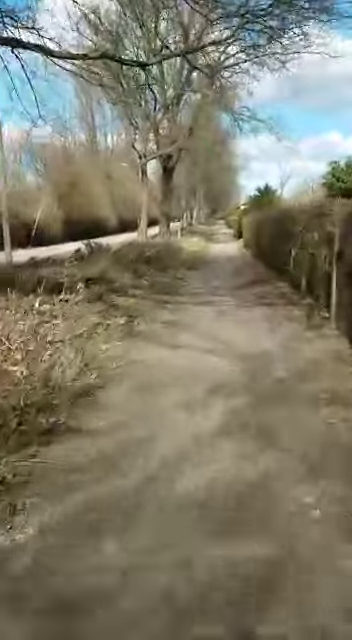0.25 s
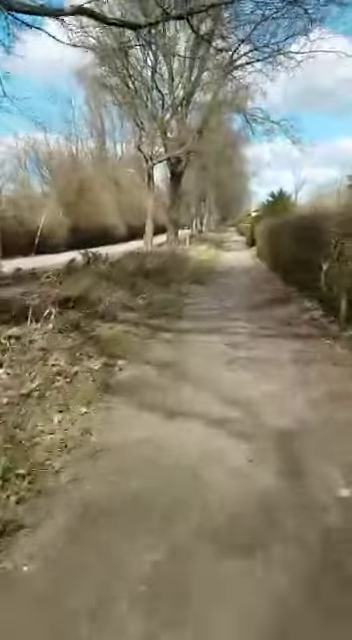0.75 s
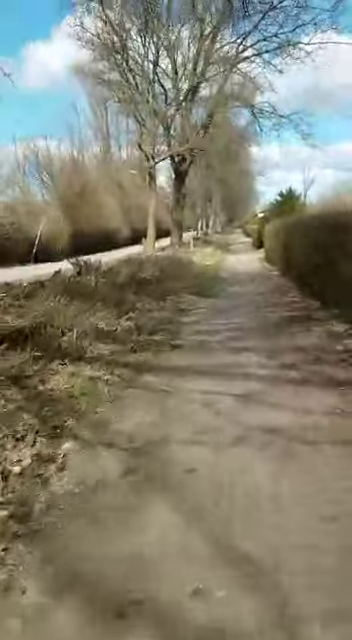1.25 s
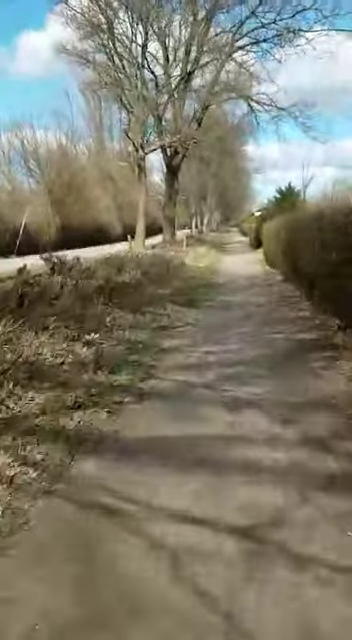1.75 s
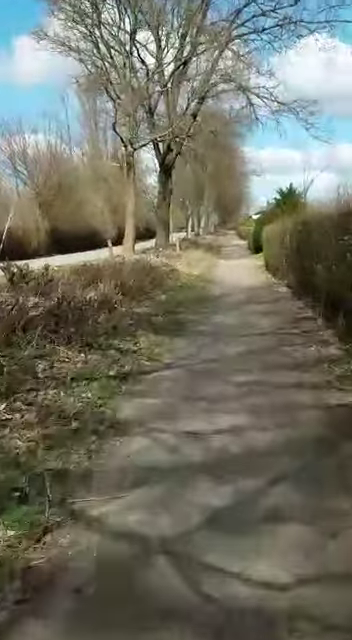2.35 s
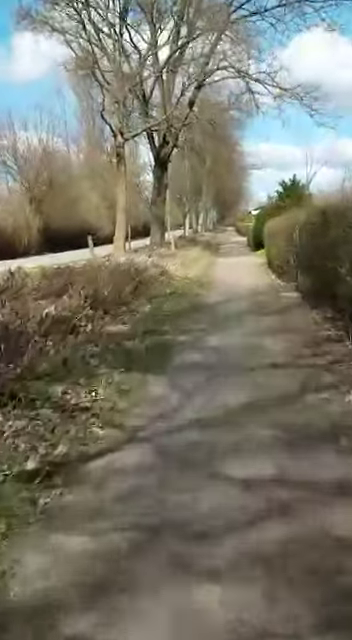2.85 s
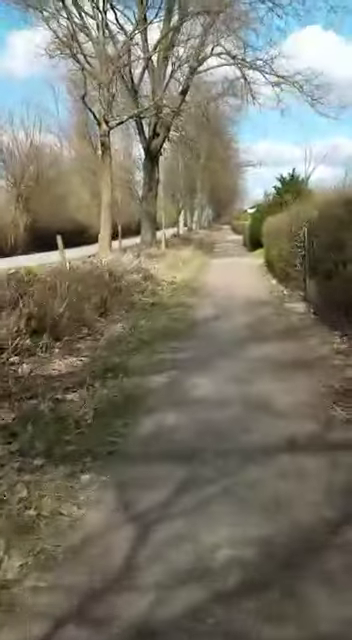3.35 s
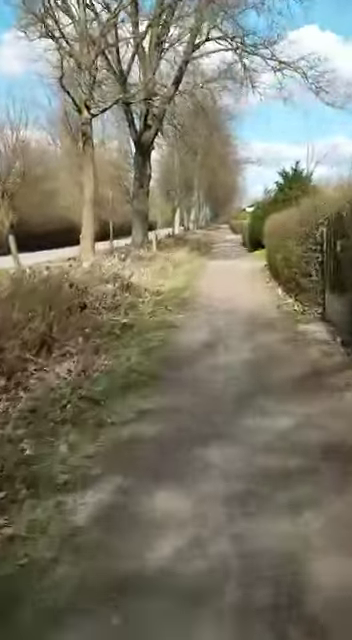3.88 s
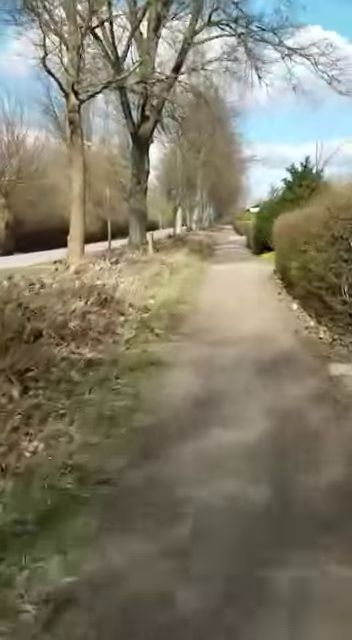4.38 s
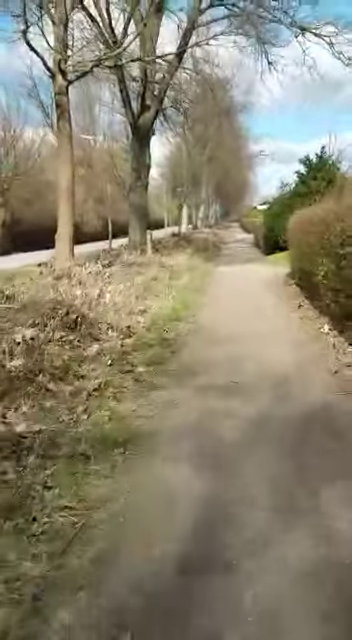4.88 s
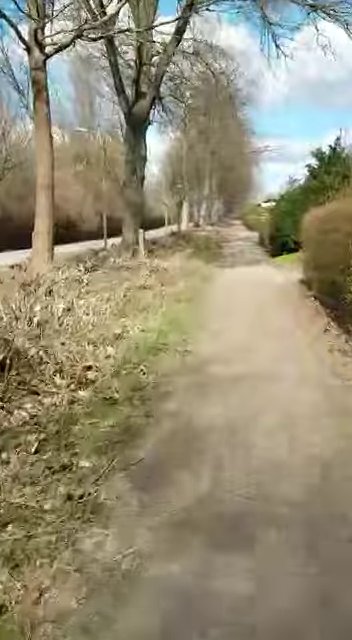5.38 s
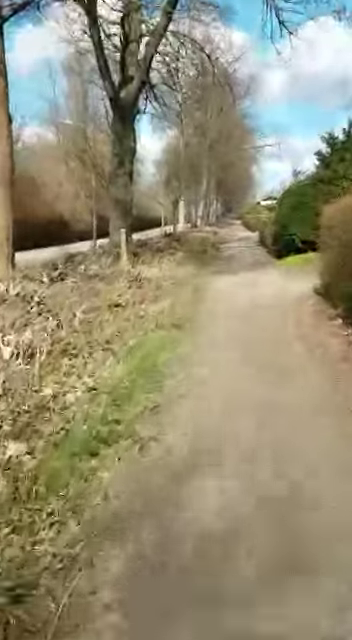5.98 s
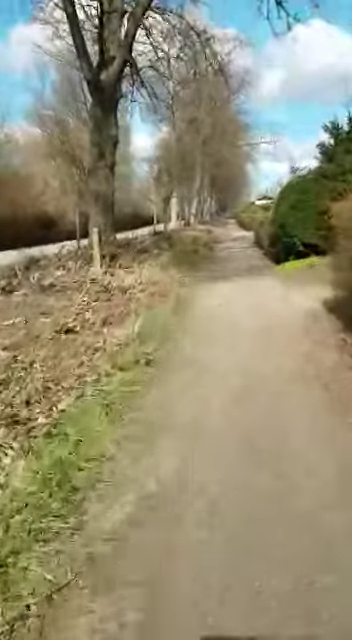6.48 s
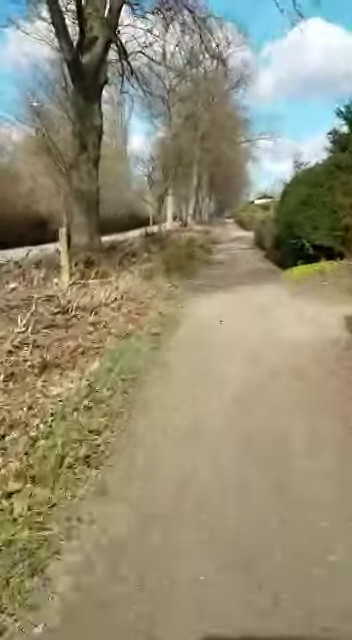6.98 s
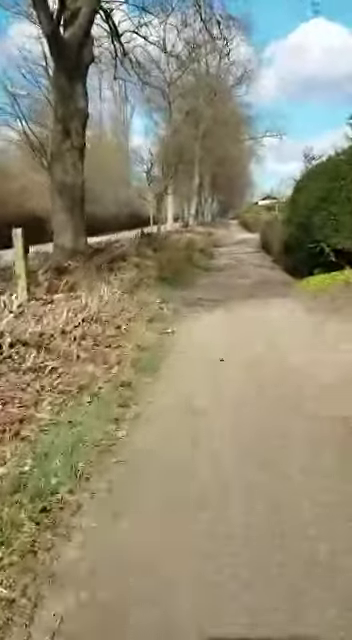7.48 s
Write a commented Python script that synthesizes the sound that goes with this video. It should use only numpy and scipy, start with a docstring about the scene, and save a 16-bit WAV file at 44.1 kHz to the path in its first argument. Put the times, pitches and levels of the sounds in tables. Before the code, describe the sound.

A small electric vehicle travels at a steady pace along an uneven dirt path, heard from a stereo microphone riding on board. Deep chassis rumble, a low wavering hum near 240 Hz and soft tyre hiss last throughout. A higher whine, leaning right, is clearest at the start, drops out near 0.5 s, returns briefly and fades back by 1.2 s. Loose plastic panels knock, bounce and ping irregularly, mostly on the right. A faint clear squeak appears around 0.9 s, with thin hoarse squeals from 0.7 to 1.3 s and again at 3.3 to 3.8 s. Ruts boom at 0.3, 1.4, 1.9 and 2.3 s. A strong rattle hits near 3.1 s; things ease around 4.1 to 4.6 s, with a small grit spurt. Booms and dense clatter peak from 5.6 to 6.4 s, then thin out, with more bumps near 7.4 s. Motion continues to the end, about 7.7 s.

```python
"""Electric vehicle on a bumpy dirt path

On board a small electric vehicle at a steady pace: the tyres shake the chassis and frame into a low
rumble, made of noise through resonances, and ruts make the frame boom. The drive hums and whines as
wavering sines. Loose plastic panels chatter at every jolt, mostly on the right: noise bursts through
resonances, plus pings. Grit hisses and cracks under the wheels; a thin squeal and a squeak come and go."""
import sys
import numpy as np
from scipy import signal
from scipy.fft import rfft, irfft, next_fast_len
from scipy.io import wavfile
from scipy.ndimage import uniform_filter1d

SR = 44100
rng = np.random.default_rng(int(sys.argv[2]) if len(sys.argv) > 2 else 0)


def log_audio(samples):
    """Write samples as a 16-bit WAV file to the path given in sys.argv[1]."""
    # one column per channel
    frames = np.atleast_2d(samples).T
    # limit to full scale, then quantise
    limited = np.clip(frames, -1, 1)
    pcm = np.round(limited * 32767).astype(np.int16)
    wavfile.write(sys.argv[1], SR, pcm)


N = 340893
TIME = np.arange(N) / SR
SIZE = next_fast_len(N + SR // 4, real=True)  # room for the filters to ring out
FREQ = np.arange(SIZE // 2 + 1) * SR / SIZE

# resonances of the frame: (frequency [Hz], width [Hz], left level [dB], right level [dB])
FRAME_MODES = [(114.6, 32.5, -8.5, 2), (139, 25.5, -3, -2), (161, 27, -13, -3.5), (207.1, 17.5, -4.5, -0.5),
               (242, 22.5, -11, -8), (301, 48.4, -13, -8.5), (375, 24, -25.5, -18), (454, 50, -20.5, -14),
               (577, 41.4, -19.5, -12.5)]


def undb(db):
    """Decibels to gain."""
    return 10 ** (np.asarray(db) / 20)


def curves(table):
    """Each column of a table, joined by straight lines in time."""
    s, *columns = np.transpose(table)
    return [np.interp(TIME, s, column) for column in columns]


def walk(rate):
    """Random levels held 1 / rate s and slewed twice; spread near 1."""
    k = max(int(SR / rate), 2)
    held = np.repeat(rng.standard_normal(N // k + 1), k)
    slewed = uniform_filter1d(uniform_filter1d(held, k), k)
    return np.sqrt(2) * slewed[:N]


def noise(alike):
    """White noise at two ears that share a part of it."""
    alike = np.clip(alike, 0, 1)
    shared = np.sqrt(alike) * rng.standard_normal(N)
    return shared + np.sqrt(1 - alike) * rng.standard_normal((2, N))


def colour(x, gain):
    """Causal filter with one gain curve per ear; white noise keeps its power, averaged over the ears."""
    # folding the cepstrum forward in time makes the filter minimum-phase, so nothing sounds early
    cepstrum = irfft(np.log(gain / np.sqrt(np.mean(gain ** 2)) + 1e-7), SIZE)
    cepstrum[:, 1:SIZE // 2] *= 2
    cepstrum[:, SIZE // 2 + 1:] = 0
    return irfft(rfft(x, SIZE) * np.exp(rfft(cepstrum)), SIZE)[:, :N]


def ring(x, modes):
    """Pass a force through steep-sided resonances, each with its own strength at each ear."""
    hz, width, *ears_db = np.transpose(modes)
    shapes = 1 / (1 + ((FREQ - hz[:, None]) / width[:, None]) ** 2) ** 2
    return colour(x, np.sqrt(undb(ears_db) ** 2 @ shapes))


def hold(x, seconds):
    """Even out the slow chance swells of a noise to rms 1."""
    power = uniform_filter1d(np.mean(x ** 2, axis=0), max(int(seconds * SR), 2))
    return x / np.sqrt(power + 1e-12)


def from_right(x, lag_s):
    """The left ear hears it a little later."""
    return np.array([np.interp(TIME - lag_s, TIME, x[0]), x[1]])


def add(track, s, sound):
    """Mix a short sound into a track at time s."""
    i = int(np.clip(s * SR, 0, N - 1))
    track[..., i:i + sound.shape[-1]] += sound[..., :N - i]


def clatter(per_s, decay_s, spread_db):
    """Strength of many small chance contacts, each sharp at first and quickly gone; rms 1."""
    chance = rng.random(N) < per_s / SR
    energy = chance * undb(spread_db * np.clip(rng.standard_normal(N), -2, 2)) ** 2
    energy = signal.lfilter([1], [1, -np.exp(-1 / (decay_s * SR))], energy)
    return np.sqrt(energy / np.mean(energy))


def roughness():
    """How much rougher than average the path is, in dB; it drives rumble, motor sag, rattle and grit."""
    # roughness of the path, only its swing about the mean counts: (time [s], roughness [dB])
    ground = [(0.0, -38.5), (0.11, -51.5), (0.29, -41), (0.56, -53.5), (0.74, -51.5), (0.88, -43.5),
              (1.22, -46), (1.55, -44.5), (1.8, -46.5), (1.98, -47), (2.3, -37), (2.6, -49), (3.0, -46),
              (3.12, -40), (3.6, -45), (3.93, -42), (4.05, -48.5), (4.28, -51), (4.72, -50), (4.97, -41),
              (5.22, -47.5), (5.38, -42), (5.8, -43), (5.98, -35.5), (6.12, -42), (6.3, -35.5),
              (6.58, -50.5), (6.76, -43.5), (7.03, -50), (7.4, -43), (7.53, -48), (7.73, -41)]
    db, = curves(ground)
    return db - np.mean(db)


def rumble():
    """The uneven ground rocks the chassis on its tyres and shakes the frame."""
    # level of the chassis rumble: (time [s], level [dB])
    heave = [(0, -15.5), (.3, -12.5), (.62, -18.5), (1.65, -15), (2.3, -17), (3.3, -15.5), (3.75, -18.5),
             (3.9, -19), (4.0, -13.5), (4.1, -18.5), (4.5, -17), (4.6, -15.5), (4.8, -19), (6.25, -16.5),
             (6.55, -18.5), (7.05, -16.5), (7.73, -21)]
    # resonances of the chassis: (frequency [Hz], width [Hz], left level [dB], right level [dB])
    chassis_modes = [(27, 11, -13.5, -10), (44, 12, -7.5, -4), (64, 8.5, -.3, 3.2), (78, 14, -11, -8)]
    shake_db, shake_rise = -20, 0.15  # on average ground; dB per dB of roughness
    chassis = hold(ring(noise(alike=0.98), chassis_modes), seconds=0.18) * undb(curves(heave)[0])
    frame = hold(ring(noise(alike=0.95), FRAME_MODES), seconds=.08)
    frame = frame * undb(shake_db + shake_rise * roughness())
    return from_right(chassis + frame, lag_s=0.00006)


def motor():
    """Motor and gear tones: rough ground slows them, and their speed and strength waver at random."""
    # swell of the whine: (time [s], level [dB])
    drive = [(0.0, -24.5), (0.49, -49), (0.62, -27.5), (1.22, -35.5), (7.73, -35.5)]
    # (multiple of the whine [1], left level [dB], right level [dB],
    #  share of the whine's swell [0-1], flutter [dB])
    tones = [(.5, 3.5, 7.5, 0.07, 1.5), (1, -12, 2.5, 0.96, 1.8), (1.261, -21, -3.5, 0.3, 4),
             (1.501, -39, -17, 0.1, 0)]
    whine_hz, sag_hz_per_db = 486, .5
    whine_db, = curves(drive)
    hz = whine_hz - sag_hz_per_db * roughness()
    turns = np.cumsum(hz * (1 + .008 * walk(9) + .002 * walk(30))) / SR
    mean_db, out = np.mean(whine_db), 0
    for multiple, left_db, right_db, share, flutter_db in tones:
        flutter = flutter_db * np.clip(walk(16), -2, 2)
        swell_db = mean_db + share * (whine_db - mean_db) + flutter
        # play in the gears lets each tone slip a little against the shaft
        slip = .07 * walk(24)
        tone = np.sqrt(2) * np.sin(2 * np.pi * (multiple * (turns + slip) + rng.random()))
        out = out + undb([[left_db], [right_db]]) * undb(swell_db) * tone
    return out


def blows():
    """Every knock as (s, level dB, hardness, thud dB): each jolt's fading bounces, then small stones."""
    # jolts that set the loose panels bouncing: (time [s], knock level [dB], hardness [0-1],
    #  thud of the shell [dB], knocks [count], time between knocks [s])
    jolts = [(.047, -37, 0.1, -30.5, 1, 0), (0.1688, -31.5, 0.1, -25.5, 1, 0), (0.2619, -31, 0, -24, 1, 0),
             (0.281, -27, 0.88, -25.5, 1, 0), (0.445, -31.5, 0.4, -27.5, 2, 0.024),
             (.594, -35.5, 0.2, -39, 2, 0.053), (0.6667, -28, 0.55, -28.5, 1, 0),
             (0.808, -25.5, 0.2, -32, 1, 0.0054), (0.84, -25.5, 0.4, -21.5, 1, 0),
             (0.9498, -27, 0.82, -25, 2, 0.024), (1.068, -28, 0.55, -34, 1, 0),
             (1.112, -41, 0.2, -34, 2, 0.067), (1.231, -36, 0.1, -31.5, 1, 0), (1.28, -27, 0.43, -30, 1, 0),
             (1.3365, -32, 0.1, -27, 1, 0), (1.4115, -25, .75, -26.5, 1, 0),
             (1.5323, -26, 0.59, -25, 2, 0.036), (1.655, -31.5, 0.4, -29, 1, 0),
             (1.692, -29, 0.46, -29, 2, 0.036), (1.849, -35, 0.1, -29.5, 1, 0),
             (1.873, -30, 0.54, -32, 1, 0), (1.96, -36.5, 0.35, -40, 1, 0), (2.045, -30, 0.1, -27, 1, 0),
             (2.107, -33.5, 0.5, -28, 1, 0), (2.156, -26.5, 0.5, -22, 2, .028), (2.2, -25, 0.6, -26, 1, 0),
             (2.253, -33, 0.2, -45, 1, 0), (2.2803, -27, 0, -26.5, 2, 0.042),
             (2.351, -24, 0.6, -23.5, 2, 0.04), (2.4693, -33.5, 0, -33.5, 2, 0.029),
             (2.535, -31, 0, -30, 1, 0), (2.6688, -30, 0.5, -27, 1, 0),
             (2.7354, -27, 0.42, -24.5, 2, 0.056), (2.8829, -32, 0.4, -28, 1, 0),
             (2.971, -34, 0, -40, 1, 0.012), (3.0336, -27, 0.4, -27, 1, 0), (3.06, -19.5, 0.3, -23, 1, 0),
             (3.0805, -24.5, 0.74, -26.5, 1, 0), (3.114, -28, .1, -24, 1, 0), (3.162, -27, 0, -29, 1, 0),
             (3.183, -28.5, 0.57, -25, 1, 0), (3.242, -37, .2, -23, 1, 0), (3.2637, -25.5, 0.71, -34, 1, 0),
             (3.316, -34, 0, -32, 1, 0), (3.402, -24, 0.48, -24.5, 1, 0),
             (3.4715, -28.5, 0.53, -28.5, 2, 0.067), (3.5901, -33, 0, -40, 1, 0),
             (3.667, -24, 0.46, -24, 2, 0.053), (3.817, -24.5, 0.4, -25, 2, 0.052),
             (3.9295, -23.5, 0.54, -23, 2, 0.018), (4.145, -44, .2, -35, 1, 0),
             (4.481, -40, 0.3, -33, 1, 0), (4.6442, -27, 0.38, -30, 1, 0), (4.81, -30, 0.7, -27, 2, 0.061),
             (4.919, -33, .1, -36, 1, 0), (4.9465, -33.5, 0.55, -41, 3, 0.029),
             (5.064, -30.5, 0.33, -30, 1, 0), (5.1035, -24.5, 0.6, -28.5, 1, 0),
             (5.3163, -28.5, 0.55, -27, 1, 0), (5.354, -35, 0, -32, 2, .02), (5.402, -30.5, 0, -28, 1, 0),
             (5.4494, -28, 0.5, -37, 1, 0), (5.533, -38, 0, -30, 1, 0), (5.5614, -23.5, 0.71, -21, 1, 0),
             (5.632, -28, 0.95, -27, 1, 0), (5.676, -32, 0.7, -26, 3, 0.033),
             (5.8303, -29.5, 0.15, -36, 1, 0), (5.8939, -28.5, 0.2, -22.5, 1, 0),
             (5.9379, -27, 0.72, -23.5, 2, 0.022), (5.978, -26, 0.67, -21.5, 3, 0.032),
             (6.099, -31, .1, -30, 1, 0), (6.1695, -25, 0.62, -23.5, 2, 0.027),
             (6.234, -24, 0.6, -23.5, 1, 0), (6.274, -31, .3, -32, 1, 0),
             (6.298, -24.5, 0.34, -27, 2, 0.025), (6.3465, -24.5, 0.4, -26, 3, 0.042),
             (6.499, -33, 0.2, -29, 1, 0), (6.724, -29.5, 0.2, -26, 2, 0.019), (6.791, -39, 0.3, -41, 1, 0),
             (6.8197, -32, 0.69, -30, 2, 0.054), (6.976, -35, .2, -39, 1, 0),
             (7.1328, -26, 0.4, -28, 2, 0.038), (7.243, -34, .1, -44, 1, 0), (7.376, -28, 0.3, -30, 1, 0),
             (7.429, -29.5, 0.1, -24, 1, 0), (7.4531, -30, 0.6, -31, 1, 0), (7.594, -34, 0.6, -28, 1, 0),
             (7.7061, -31.5, 0.45, -24.5, 1, 0)]
    # each bounce is this much weaker, and softer by this share
    bounce_loss_db, bounce_softens = 1.3, 0.36
    # small stones: level on average ground, dB per dB of roughness, scatter, thud relative to knock
    stones_per_s, stone_db, stone_rise, stone_scatter_db, stone_thud_db = 10, -41, 1.3, 5, -7
    out = []
    for s, db, hardness, thud_db, count, gap in jolts:
        for k in range(round(count)):
            loss_db = k * bounce_loss_db
            softer = np.clip(hardness, 0, 1) * (1 - bounce_softens) ** k
            out.append((s + k * gap, db - loss_db, softer, thud_db - loss_db))
    rough_db = roughness()
    # one stone at a random moment of each slot
    for k, (when, size, hardness) in enumerate(rng.random((int(stones_per_s * N / SR), 3))):
        s = (k + when) / stones_per_s
        db = stone_db + stone_rise * np.interp(s, TIME, rough_db) + stone_scatter_db * (2 * size - 1)
        out.append((s, db, hardness / 2, db + stone_thud_db))
    return out


def chatter(burst_s, tail_s, left_tail_db, right_tail_db, grain_db):
    """The force of one jolt: a burst of tiny contacts, and a diffuse tail at each ear."""
    t = TIME[:SR // 8]
    chance = rng.standard_normal((4, len(t)))
    grain = np.repeat(chance[1], 16)[:len(t)]
    burst = chance[0] * undb(grain_db * grain)
    # a longer burst also builds up more slowly
    rise = 1 - np.exp(-t / (.2 * burst_s))
    burst = burst * rise * np.exp(-(t / burst_s) ** 2)
    burst /= np.sqrt(np.sum(burst ** 2) / (burst_s * SR))
    tail = chance[2:] * rise * np.exp(-t / tail_s)
    return burst + undb([[left_tail_db], [right_tail_db]]) * tail


def spot(force):
    """Every contact lands on another spot; the reflection from the panel's edge gives it its own colour."""
    depth, longest_lag_s = .6, .0005  # two more samples are added to the lag
    where, side = rng.random(2)
    lag = 2 + int(where * longest_lag_s * SR)
    reflected = np.pad(force, ((0, 0), (lag, 0)))[:, :-lag]
    return (force + np.sign(side - .5) * depth * reflected) / np.hypot(1, depth)


def ping():
    """A small panel rings on after a knock; the spot hit sets the mix of its modes and bends their pitch."""
    # modes before bend and scatter:
    #  (frequency [Hz], time to fall 60 dB [s], left level [dB], right level [dB])
    ping_modes = [(2070, 0.063, -9.5, -11.5), (2233, 0.078, -26, -2.5), (2760, 0.052, -32, -23),
                  (3440, 0.055, -39, -14.5), (4297, 0.038, -27, -18)]
    scatter_db, detune = 6, .018
    t = TIME[:SR // 14]
    hz, t60, *ears_db = np.transpose(ping_modes)
    mix, bend, turn = rng.uniform(-1.09, 1, (3, len(ping_modes)))
    modes = np.sin(2 * np.pi * np.outer(hz * (1 + detune * bend), t) + np.pi * turn[:, None])
    decay = np.exp(-np.log(1000) * t / t60[:, None])
    modes = modes * decay * (1 - np.exp(-(t / .003) ** 2))  # soft onset
    return 2 * undb(ears_db + scatter_db * mix) @ modes


def bodywork():
    """Jolts throw loose panels and a metal catch against the shell; the panels also tremble all along."""
    # resonances and broad bands of the loose panels, the shell, the metal catch and the sharp crack,
    # all: (frequency [Hz], width [Hz], left level [dB], right level [dB])
    panel_modes = [(1520, 71, 3.5, 1), (1623, 23, 3, -3), (1831, 44, -11, 5), (1950, 35, -30, 0.5),
                   (2050, 120, -3, -24), (2220, 50, -8, 1.5), (2360, 160, -12.5, -3), (2580, 50, -6.5, -1),
                   (2705, 280, -37, -4.5), (3204, 82, -10, -5.5), (3520, 100, -41, -6),
                   (3890, 49, -29, -7.5), (4270, 370, -32, -13.5), (5540, 200, -32, -17),
                   (5840, 83, -22, -19), (6150, 280, -45, -13), (6800, 120, -46, -23),
                   (1720, 1540, -19, -11)]
    shell_modes = [(314.8, 33.8, 8.5, 16), (365.4, 25, 6.5, 10), (453.3, 47, 4.5, 9.5), (579, 44, 2.5, 3.5),
                   (629, 56, -9, 4.5), (728, 58, 0.5, 3), (795, 46, -5.5, 0.5), (879, 46, -3.5, 3.5),
                   (997, 31, -0.5, -3), (1100, 64, -6.5, -1.5), (1245, 360, -18, -6.5)]
    catch_modes = [(2340, 25, 2, -4), (3540, 79, -15, 4), (3900, 32, -9, 0.5), (4300, 160, -25, 3.5),
                   (4560, 34, -8, -12), (4920, 160, -28, -7.5), (10850, 2100, -26, -20)]
    crack_modes = [(4100, 3000, -26, 19.5), (8050, 300, -20, -25), (10200, 3300, 7, 1),
                   (11100, 780, -3, 13.5), (13100, 600, -19, 13.5), (14500, 1300, -27, -1)]
    # on average ground; dB per dB of roughness
    tremble_db, tremble_rise = -49.5, 1.35
    drum_db, drum_rise = -32, 0.63
    # relative to the knock's level: a soft contact, and what a fully hard one adds
    catch_db, catch_hard_db = -18, 15.5
    crack_db, crack_hard_db = -48, 50.5
    ping_db = -1.5  # relative to the knock's level
    frame_thud_db = -1  # how strongly the thuds also shake the frame
    thud_shared = 0.5  # gain of each ear's thud at the other ear, relative to its own
    knocks, pings, clacks, thuds, cracks = np.zeros((5, 2, N))
    rough_db = roughness()
    contacts = clatter(per_s=120, decay_s=.004, spread_db=3.5)
    tremble = noise(alike=0.38) * contacts * undb(tremble_db + tremble_rise * rough_db)
    flutter_db = 2 * np.clip(walk(60), -2, 2)
    drumming = noise(alike=0.82) * undb(drum_db + drum_rise * rough_db + flutter_db)
    for s, db, hardness, thud_db in blows():
        wait, weight = rng.random(2)
        knock = spot(chatter(burst_s=.012, tail_s=.021, left_tail_db=0, right_tail_db=-3, grain_db=4))
        rebound = spot(chatter(burst_s=.009, tail_s=.016, left_tail_db=0, right_tail_db=-4, grain_db=4))
        clack = spot(chatter(burst_s=.0065, tail_s=.012, left_tail_db=0, right_tail_db=-7, grain_db=5))
        crack = chatter(burst_s=.0065, tail_s=.011, left_tail_db=-3, right_tail_db=-6, grain_db=4)
        thud = chatter(burst_s=0.01, tail_s=0.033, left_tail_db=7, right_tail_db=9.5, grain_db=5.0)
        # each starts slightly early, as it takes a moment to build up
        add(knocks, s - .0035, undb(db - 5) * knock)
        add(pings, s - .001, undb(db + ping_db) * ping())
        # the panel falls back once, more softly
        add(knocks, s + 0.012 + 0.014 * wait, undb(db - 9.5 - 10.0 * weight) * rebound)
        add(clacks, s - .0015, undb(db + catch_db + catch_hard_db * hardness) * clack)
        add(cracks, s - .0005, undb(db + crack_db + crack_hard_db * hardness) * crack)
        add(thuds, s - .003, undb(thud_db - 2.5) * thud)
    panels = from_right(ring(knocks + tremble, panel_modes) + pings, lag_s=0.00042)
    thuds = (thuds + thud_shared * thuds[::-1]) / np.hypot(1, thud_shared)
    shell = ring(thuds + drumming, shell_modes)
    frame = undb(frame_thud_db) * ring(thuds.mean(axis=0), FRAME_MODES)
    hard_parts = ring(clacks, catch_modes) + ring(cracks, crack_modes)
    return panels + from_right(hard_parts + shell + frame, lag_s=0.000228)


def tyres():
    """A steady rolling hiss of tyres and air, with fine grit and a few short spurts of it."""
    # spectrum of the hiss: (frequency [Hz], left level [dB], right level [dB])
    hiss_curve = [(300, -6, 21), (915, 0.5, 23), (1550, 16, 10.5), (2290, 2.5, 9), (3150, 0, 0),
                  (4500, -8.5, 3), (7000, -15, -2.5), (7900, -21, -14.5), (9300, -7, -10),
                  (15600, -15.5, -7.5)]
    # short spurts of grit: (start [s], level [dB], length [s])
    spurts = [(0.19, -43, 0.021), (4.064, -41, 0.019), (4.792, -43, 0.015), (6.008, -41, 0.019),
              (6.43, -48, 0.024)]
    # broad bands of the grit: (frequency [Hz], width [Hz], left level [dB], right level [dB])
    spray_bands = [(5300, 2900, -6, -0.5), (10900, 840, -3, -1.1), (15900, 3700, -2, -0.11)]
    # on average ground; dB per dB of roughness
    hiss_db, hiss_rise = -41, 0.13
    grit_db, grit_rise = -64.0, 0.95
    grain_db, flutter_db = 3.8, 3  # fast and slower random wavering of the grit
    hz, *ears_db = np.transpose(hiss_curve)
    gain = undb([np.interp(np.log(FREQ + 1), np.log(hz), ear) for ear in ears_db])
    rough_db = roughness()
    waver_db = .7 * walk(33) + 1.1 * walk(2.5)
    hiss = colour(noise(alike=0.036) * undb(hiss_db + hiss_rise * rough_db + waver_db), gain)
    grit_level_db = grit_db + grit_rise * rough_db + grain_db * walk(1500) + flutter_db * walk(60)
    grains = noise(alike=0.15) * undb(grit_level_db)
    for s, db, length in spurts:
        swell = np.exp(-(2 * (TIME - s) / length - 1) ** 2)
        grains = grains + noise(alike=0.22) * undb(db) * swell
    return hiss + ring(grains, spray_bands)


def crunch():
    """Grains of grit crack one by one under the tyres."""
    contacts = clatter(per_s=32, decay_s=.004, spread_db=3.5) * undb(-48.5)
    # (frequency [Hz], width [Hz], left level [dB], right level [dB])
    bands = [(950, 330, 2, 2.3), (1870, 900, -5, -2.3)]
    return ring(noise(alike=0.46) * contacts, bands)


def ruts():
    """A wheel drops into a rut and gives the frame a quick shove that makes it boom."""
    # (middle [s], level [dB], length [s])
    drops = [(0.303, -21, 0.057), (1.43, -18, 0.05), (1.888, -19.5, 0.04), (2.33, -20, 0.15),
             (2.798, -20, 0.028), (5.695, -17, 0.056), (5.97, -20, .05), (6.205, -17.5, 0.11),
             (6.332, -17, 0.035), (6.774, -23, 0.029), (7.362, -20.5, 0.042), (7.454, -21, 0.036)]
    # a quick shove carries little below 183 Hz
    low_cut = signal.butter(4, 183, "high", fs=SR, output="sos")
    shove = signal.sosfilt(low_cut, noise(alike=0.91))
    swell = sum(undb(db) * np.exp(-(2 * (TIME - s) / length) ** 2) for s, db, length in drops)
    return hold(ring(shove, FRAME_MODES), seconds=.025) * swell


def squeal():
    """A faint, hoarse high tone with partials around it comes and goes, its pitch gliding."""
    # (start [s], end [s], first pitch [Hz], last pitch [Hz], level [dB])
    glides = [(0.715, .98, 9600, 10050, -61), (0.983, 1.28, 9050, 9900, -60.5),
              (3.346, 3.84, 9250, 9060, -59)]
    # (multiple of the pitch [1], level [dB])
    partials = [(.89, -10), (1, 1), (1.09, -10), (1.33, -2), (1.4, -9), (1.62, -8)]
    out = 0
    for start, end, first_hz, last_hz, db in glides:
        glide_hz = np.interp(TIME, [start, end], [first_hz, last_hz])
        hz = glide_hz * (1 + .004 * walk(20) + .012 * walk(1000))
        swell = undb(db) * np.clip(np.minimum(TIME - start, end - TIME) / 0.052, 0, 1)
        phase = 2 * np.pi * np.cumsum(hz) / SR
        tone = sum(undb(part_db) * np.sin(multiple * phase) for multiple, part_db in partials)
        # fast random strength at each ear makes it hoarse
        out = out + swell * tone * np.array([walk(450), walk(450)])
    return out


def squeak():
    """One faint, clear tone swells and fades, mostly on the right."""
    middle_s, length_s, pitch_hz, level_db = 0.89, .15, 3390, -51
    phase = 2 * np.pi * np.cumsum(pitch_hz * (1 + .004 * walk(60))) / SR
    swell = undb(level_db) * np.exp(-(2 * (TIME - middle_s) / length_s) ** 2)
    return undb([[-10], [0]]) * swell * np.sin(phase)


def scene():
    """Everything rides along with the microphone."""
    return rumble() + motor() + bodywork() + tyres() + crunch() + ruts() + squeal() + squeak()


def record(dry):
    """The recorder drops the deepest bass, rounds the highest peaks and cuts the top."""
    peak, top_hz = .93, 15720
    dry = signal.sosfilt(signal.butter(2, 16, "high", fs=SR, output="sos"), dry)
    dry = dry / (1 + (dry / peak) ** 8) ** (1 / 8)
    return signal.sosfilt(signal.ellip(10, .2, 80, top_hz, fs=SR, output="sos"), dry)


dry = scene()
out = record(dry)
log_audio(out)
```